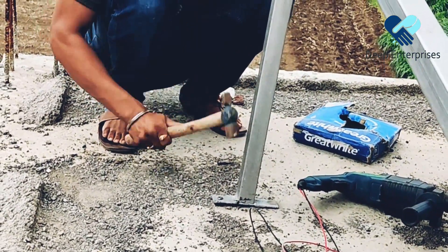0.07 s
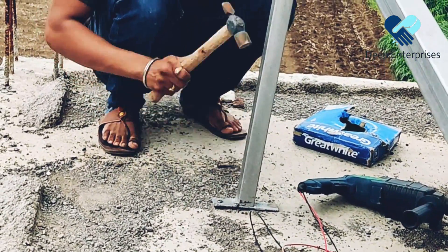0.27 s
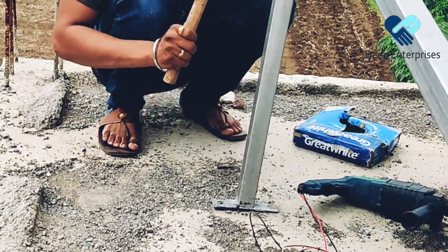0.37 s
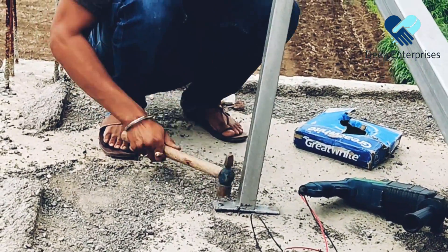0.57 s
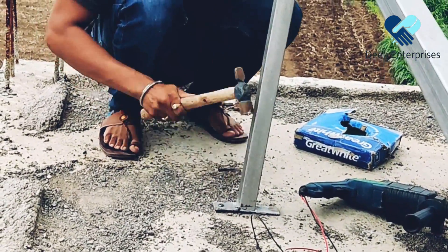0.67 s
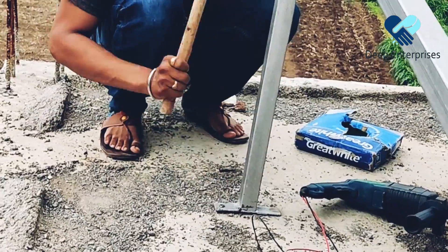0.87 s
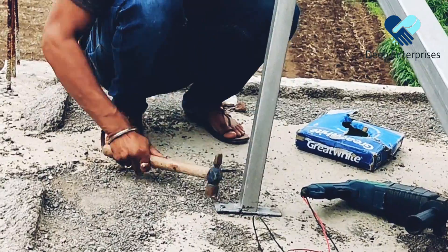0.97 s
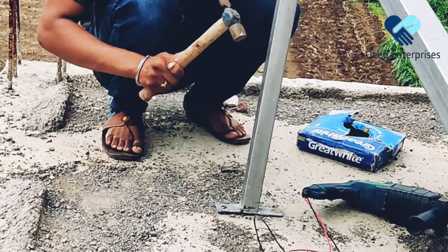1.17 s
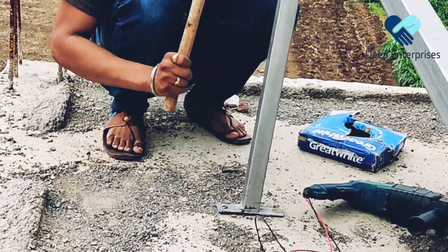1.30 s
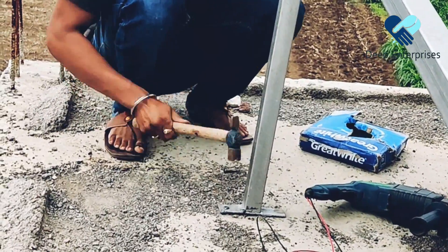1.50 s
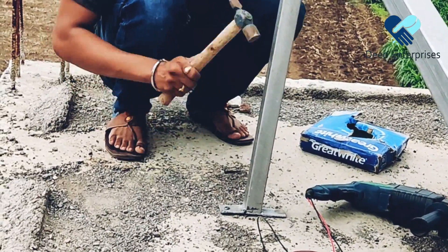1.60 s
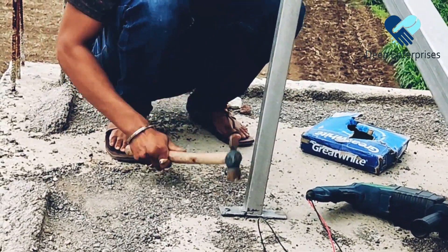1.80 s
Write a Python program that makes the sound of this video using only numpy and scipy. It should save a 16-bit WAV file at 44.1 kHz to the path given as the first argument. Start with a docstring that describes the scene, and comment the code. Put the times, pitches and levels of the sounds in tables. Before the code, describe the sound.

A hammer strikes a steel plate four times outdoors with sharp, ringing clanks.

```python
"""Outdoors on a concrete slab, a hammer strikes the steel foot plate of a post four times. Each impact gives a
broadband clash and a dull knock, and excites the damped modes of the plate and, more faintly, of the post and
the hammer head. Nearby walls reflect the sound over a low rumble, a hiss and one thin whistle. The blows
overload the microphone, and three of them throw its right channel into a slow swing."""
import sys
import numpy as np
from scipy import signal
from scipy.fft import rfft, irfft, next_fast_len
from scipy.io import wavfile
from scipy.ndimage import map_coordinates

SR = 44100
rng = np.random.default_rng(int(sys.argv[2]) if len(sys.argv) > 2 else 0)


def dump_mix(stems):
    """Bounce the given channels to the path in sys.argv[1] as a 16-bit WAV at rate SR."""
    frames = np.atleast_2d(stems).T  # one column per channel
    limited = np.clip(frames, -1, 1)  # hard clip at full scale
    pcm = np.round(limited * 32767).astype(np.int16)
    wavfile.write(sys.argv[1], SR, pcm)


N = 81585

# course of the background: t/s, rumble level/dB, hiss level/dB
BACKGROUND_LEVELS = [(0, -36, -48), (.2, -40.5, -51), (.55, -42.5, -56.5), (.8, -49, -57),
                     (1.0, -42, -57.5), (1.25, -39, -55.5), (1.45, -44, -58), (1.85, -50, -55)]
# noise spectra: f/Hz, relative spectral level/dB
RUMBLE_SPECTRUM = [(20, 0.5), (45, 5), (70, -3), (105, -2.5), (170, -16), (300, -26), (600, -72.5)]
HISS_SPECTRUM = [(100, -8), (550, 5), (1000, -0.5), (1800, -6), (2250, -6.5), (2900, -10.5), (4200, -5),
                 (6400, -3), (8000, -17), (12000, -23), (16000, -28.5)]
ECHO_SPECTRUM = [(40, 5), (130, 15.5), (240, 10.5), (400, 1), (800, -3.5), (1700, -3.5), (2250, 0),
                 (2900, -12), (4300, -4), (5000, -11), (6200, -0.5), (8000, -13.5), (12000, -18.5),
                 (16000, -36.5)]
KNOCK_SPECTRUM = [(25, -46), (70, 2), (130, 3.5), (250, -1.5), (400, -2.5), (750, 0), (1100, -7),
                  (2000, -11.5), (5000, -68)]
CRACK_SPECTRUM = [(300, -14.5), (1000, 3), (3000, 3.5), (6500, -1), (10000, 0.5), (16000, -3.5)]
CLASH_SPECTRUM = [(300, -21), (1300, -5.5), (2000, -7), (3000, -6.5), (4300, 0), (5000, -4.5), (5900, 0),
                  (6800, 3), (8000, -9), (10500, -12), (14500, -3), (16000, -13.5)]
# decay times of the reflections and the clash: f/Hz, T60/s
ECHO_T60 = [(130, 0.78), (500, 0.47), (2200, 0.53), (6000, 0.49), (14000, 0.48)]
CLASH_T60 = [(1000, 0.12), (4300, 0.19), (6500, 0.15), (9000, 0.11), (15000, 0.091)]
# colouring of the clash by crowded short resonances: f/Hz, relative ripple depth
RIPPLE_DEPTH = [(1000, .5), (5000, .9), (9000, 1.3)]
# stereo colour of the clash: f/Hz, right-minus-left level/dB
CLASH_BALANCE = [(1000, -1), (3000, -4.5), (6000, 2.5), (14000, 1)]
# modes of the post, the last one a faint long ring of the hammer head, one list a column: f/Hz, relative
# level/dB, T60/s
POST_HZ = [1351, 2161, 2245, 2283, 2324, 3031]
POST_DB = [-34.5, -16.5, -28.5, -31, -30.5, -41]
POST_T60 = [1.32, 0.51, 0.68, .9, 0.78, 1.1]
# modes of the foot plate, one list a column: f/Hz, relative level/dB, T60/s
PLATE_HZ = [4151, 4372, 5385, 5735, 5866, 5914, 6044, 6363, 6529, 6672, 6900, 8600, 13260, 14560]
PLATE_DB = [-20, -7, -10.5, -3.5, -7.5, 5, -18, -12.5, -8.5, 1, -10, -13, -12, -16]
PLATE_T60 = [0.29, 0.25, 0.32, 0.22, 0.23, 0.2, 0.1, 0.24, 0.17, 0.23, 0.093, 0.11, .1, .09]
# overload swings of the right channel: t/s, height/full scale, hold/s
SWINGS = [(.2070, .61, .025), (.6175, .54, .019), (1.4985, .53, .021)]
# hammer blows: t/s; relative level/dB of clash, knock, plate, post and echo; treble tilt/(dB/octave);
# hold/s; right-minus-left level/dB; f/Hz favoured by the striking spot; thud f/Hz
BLOWS = [(0.2052, 0.5, 0.5, 2.5, -1.5, 1, -1.9, 0.032, 1.5, 6410, 668),
         (0.6154, -2.5, -2, -2.5, -4, -2, -1.5, 0.023, 4.5, 5650, 619),
         (1.0543, -2, -3, -7.5, 1, 2, -2, 0.015, 0, 5390, 767),
         (1.4958, -0.5, 0, -1, 3, 1.5, -0.06, 0.03, 1, 3930, 757)]


def amp(db):
    """Amplitude ratio of a level in decibels."""
    return 10 ** (np.asarray(db) / 20)


def along(points, hz):
    """Interpolation of (f/Hz, value) points on a logarithmic frequency axis."""
    f, value = np.transpose(points)
    return np.interp(np.log(hz + 1), np.log(f + 1), value)


def pan(db):
    """Left and right gains for a right-minus-left level difference."""
    return amp(np.array([[-db], [db]]) / 2)


def since(start):
    """Time in seconds from start, for every sample."""
    return np.arange(N) / SR - start


def fade(t, t60):
    """Exponential decay from t = 0, by 60 dB in t60."""
    return np.exp(-np.log(1000) * np.maximum(t, 0) / t60)


def rise(t, tau_s):
    """First-order step response from t = 0."""
    return 1 - np.exp(-np.maximum(t, 0) / tau_s)


def wander(position):
    """Spline through random values, one per unit of position."""
    return map_coordinates(rng.standard_normal(4096), [position], mode="wrap")


def filtered(x, response):
    """Linear filtering: the spectrum is multiplied by a frequency response."""
    size = next_fast_len(N + SR // 4)
    return irfft(rfft(x, size) * response(np.fft.rfftfreq(size, 1 / SR)), size)[..., :N]


def noise(spectrum, coherence=0., extra_db=lambda hz: 0):
    """Coloured stereo noise of rms 1; a shared component makes the sides partly coherent."""
    mid, side = rng.standard_normal((2, N))
    angle = np.arccos(coherence) / 2
    pair = np.cos(angle) * mid + np.sin(angle) * np.array([side, -side])
    coloured = filtered(pair, lambda hz: amp(along(spectrum, hz) + extra_db(hz)))
    return coloured / np.sqrt(np.mean(coloured ** 2) + 1e-20)


def damped(x, starts, t60_curve):
    """Frequency-dependent damping: from each side's start, every band decays at its own rate."""
    hz, t, bands = signal.stft(x, SR, nperseg=128)
    decay = fade(t - np.reshape(starts, (-1, 1, 1)), along(t60_curve, hz)[:, None])
    return signal.istft(bands * decay, SR, nperseg=128)[1][:, :N]


def outdoors():
    """Ambient noise: a low rumble and a faint hiss, each drifting in level."""
    times, rumble_db, hiss_db = np.transpose(BACKGROUND_LEVELS)
    rumble = amp(np.interp(since(0), times, rumble_db)) * noise(RUMBLE_SPECTRUM, coherence=0.7)
    hiss = amp(np.interp(since(0), times, hiss_db)) * noise(HISS_SPECTRUM, coherence=0.2)
    return pan(0.5) * rumble + hiss


def whistle(start_s=0.775, length_s=0.16, db=-65, hz=8134):
    """A faint, high pure tone, perhaps an insect."""
    t = since(start_s)
    envelope = rise(t, 0.005) * (1 - rise(t - length_s, 0.026))
    return amp(db) * envelope * np.sin(2 * np.pi * hz * t)


def wall_echo(start, ripple_db=2.5, spacing_hz=44.92):
    """Reverberation: reflections from the walls build up and decay, with the steel's uneven colour."""
    reflections = noise(ECHO_SPECTRUM, 0.56, lambda hz: ripple_db * wander(hz / spacing_hz))
    return rise(since(start), 0.048) * damped(reflections, start, ECHO_T60)


def overload_swing(rise_s=0.0035, fall_s=0.031, recover_s=0.07, rebound_hz=2.3):
    """Overload recovery: the microphone's rest point jumps up, falls through zero and creeps back."""
    swing = np.zeros(N)
    for start, height, hold in SWINGS:
        t = since(start)
        jump = np.sin(np.pi / 2 * np.clip(t / rise_s, 0, 1)) ** 2
        fall = np.cos(np.pi * np.clip((t - hold) / fall_s, 0, 1))
        age = np.maximum(t - hold - fall_s, 0)
        recovery = np.exp(-age / recover_s) * np.cos(2 * np.pi * rebound_hz * age)
        swing += height * jump * fall * recovery
    return np.array([-0.1 * swing, swing])  # a little leaks to the left, inverted


def spot_emphasis(hz, spot_hz, peak_db=5, width_octaves=0.078):
    """Selective excitation: the striking spot favours a narrow band, given as a gain in dB."""
    return peak_db * np.exp(-0.5 * (np.log2((hz + 1) / spot_hz) / width_octaves) ** 2)


def steel_ring(t, modes, spot_hz, scatter_db=1):
    """Free vibration: a sum of damped modes, each with its own strength and phase on either side."""
    ring = np.zeros((2, N))
    for hz, db, t60 in modes:
        gain = amp(db + spot_emphasis(hz, spot_hz) + scatter_db * rng.standard_normal((2, 1)))
        phase = rng.uniform(0, 2 * np.pi) + rng.uniform(0, np.pi, (2, 1))
        ring += gain * fade(t, t60) * np.sin(2 * np.pi * hz * t + phase)
    return ring * rise(t, 0.024)


def plate_thud(t, hz):
    """A single damped oscillation: the plate's hollow note against the slab."""
    return fade(t, t60=0.077) * np.sin(2 * np.pi * hz * np.maximum(t, 0))


def slab_knock(t):
    """Impact noise of plate on concrete: dull, and decaying exponentially from t = 0."""
    return noise(KNOCK_SPECTRUM, coherence=0.059) * fade(t, t60=0.13)


def contact_crack(t, delay_s=0.0012, decay_s=0.0025):
    """A brief transient has a broad spectrum: the hard first contact is heard as a crack."""
    return noise(CRACK_SPECTRUM) * (t > delay_s) * (1 - rise(t - delay_s, decay_s))


def steel_clash(decay_starts, tilt_db, spot_hz, spacing_hz=69.4):
    """Modal overlap: crowded short resonances of steel on steel merge into noise with a rippled spectrum."""
    def colour_db(hz):
        tilt = tilt_db * np.log2(hz + 500)
        ripple = 3.5 * wander(hz / spacing_hz) * along(RIPPLE_DEPTH, hz)
        sides = np.array([[-0.5], [0.5]]) * along(CLASH_BALANCE, hz)
        return tilt + spot_emphasis(hz, spot_hz) + ripple + sides
    return damped(noise(CLASH_SPECTRUM, 0.023, colour_db), decay_starts, CLASH_T60)


def contact_envelope(t, hold, graze_s=0.0041, chatter_db=1, chatter_per_s=400, sag_db_per_s=103):
    """Excitation by impact: the head grazes, then strikes; the level chatters and sags over the hold."""
    graze = amp(-11) * np.clip(1 + t / graze_s, 0, 1)
    chatter = chatter_db * wander(since(0) * chatter_per_s)
    sag = sag_db_per_s * np.clip(t, 0, hold)
    return (graze + rise(t, 0.0008)) * amp(chatter - sag)


def hammer(right_hold_s=0.0096):
    """Superposition: each blow is the sum of impact noise, ringing steel and reflections."""
    blows = np.zeros((2, N))
    for (start, clash_db, knock_db, plate_db, post_db, echo_db,
         tilt_db, hold, pan_db, spot_hz, thud_hz) in BLOWS:
        t = since(start)
        holds = hold + np.array([[0], [right_hold_s]])  # the overloaded right side stays loud longer
        envelope = pan(pan_db) * contact_envelope(t, hold)
        crack = amp(-9) * contact_crack(t)
        thud = amp(-16.5) * plate_thud(t, thud_hz)
        clash = amp(clash_db - 11) * steel_clash(start + holds, tilt_db, spot_hz)
        knock = amp(knock_db - 17.5) * slab_knock(t - holds)
        plate = amp(plate_db - 15) * steel_ring(t, zip(PLATE_HZ, PLATE_DB, PLATE_T60), spot_hz)
        post = amp(post_db - 15) * steel_ring(t, zip(POST_HZ, POST_DB, POST_T60), spot_hz)
        echo = amp(echo_db - 26.5) * wall_echo(start)
        blows += envelope * (clash + knock) + crack + thud + pan(5.5) * plate + post + echo
    return blows


def scene():
    """The blows, the background and the overload swings add linearly."""
    return hammer() + outdoors() + whistle() + overload_swing()


def record(dry, ceiling=0.87, knee=11.7, cutoff_hz=15600):
    """Saturation rounds off the peaks, and a steep low-pass filter limits the bandwidth."""
    clipped = dry / (1 + np.abs(dry / ceiling) ** knee) ** (1 / knee)
    return filtered(clipped, lambda hz: 1 / (1 + (hz / cutoff_hz) ** 160))


dry = scene()
out = record(dry)
dump_mix(out)
```